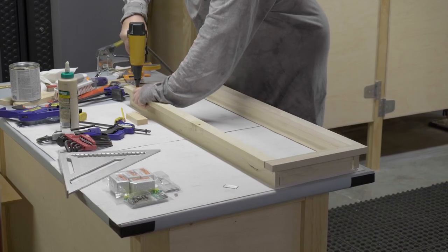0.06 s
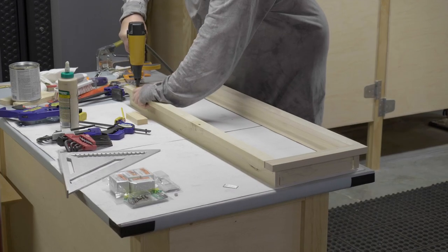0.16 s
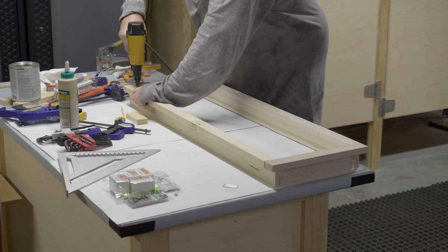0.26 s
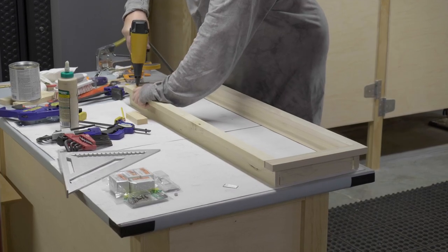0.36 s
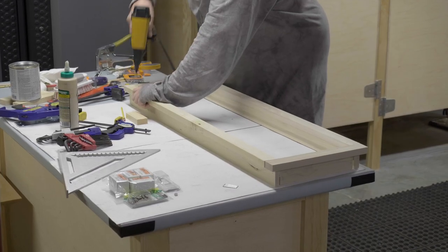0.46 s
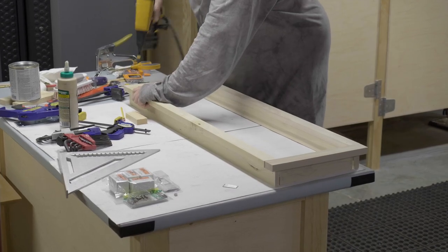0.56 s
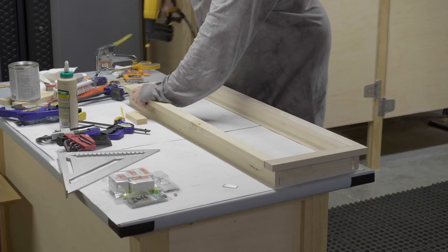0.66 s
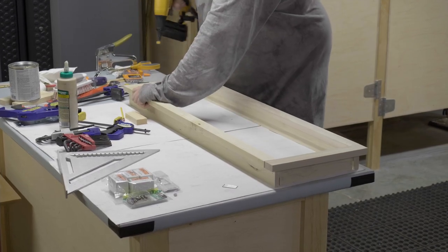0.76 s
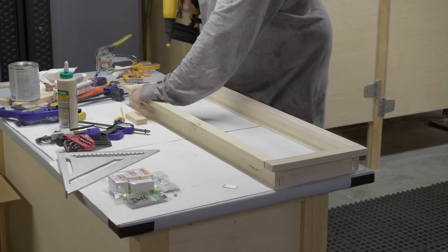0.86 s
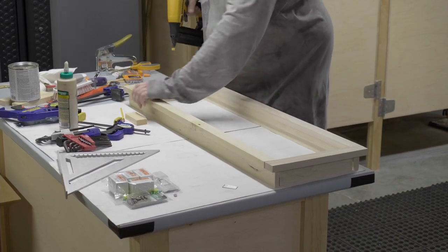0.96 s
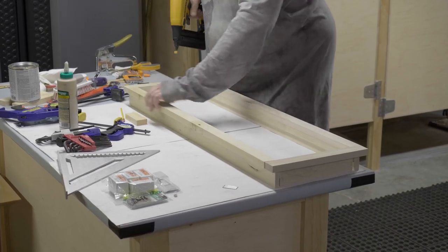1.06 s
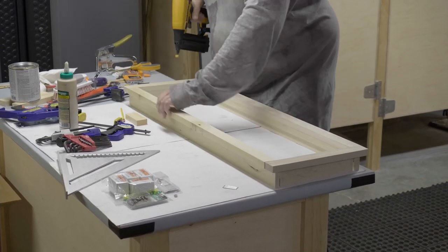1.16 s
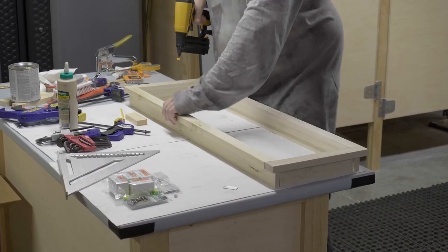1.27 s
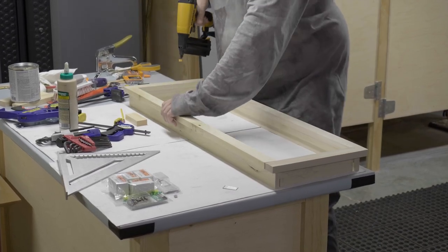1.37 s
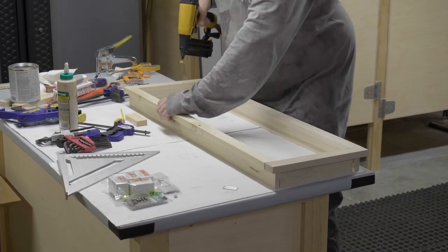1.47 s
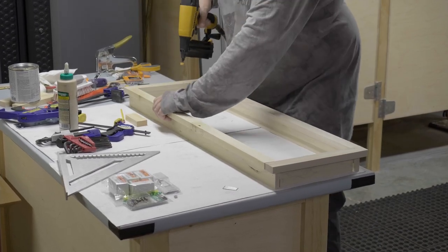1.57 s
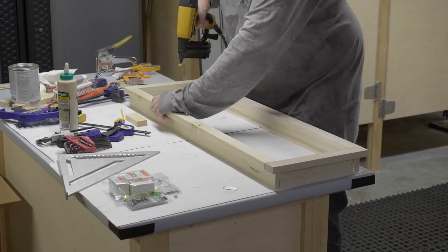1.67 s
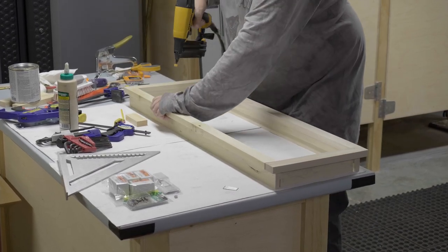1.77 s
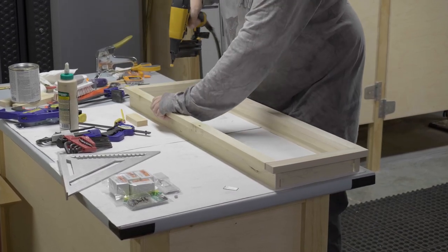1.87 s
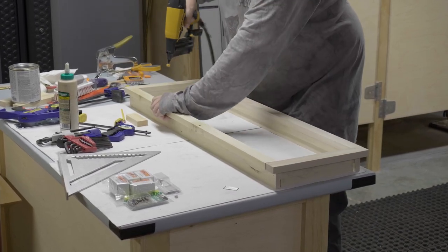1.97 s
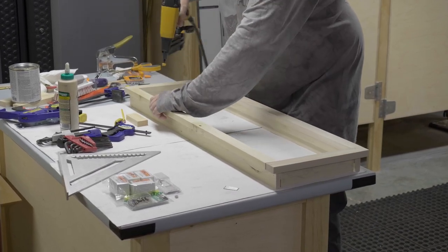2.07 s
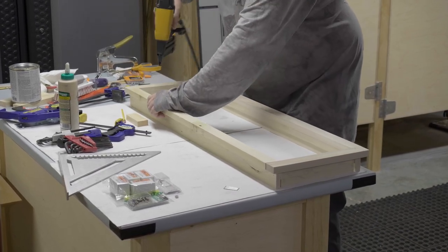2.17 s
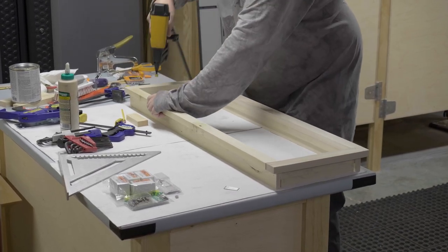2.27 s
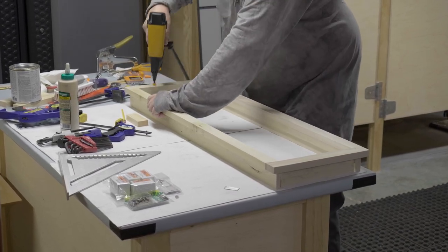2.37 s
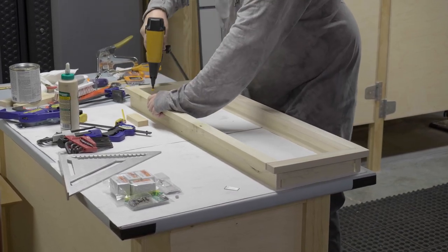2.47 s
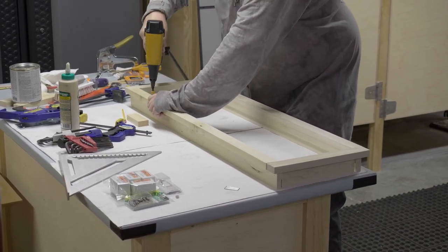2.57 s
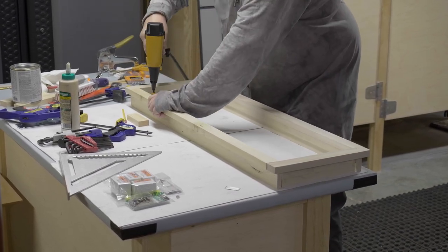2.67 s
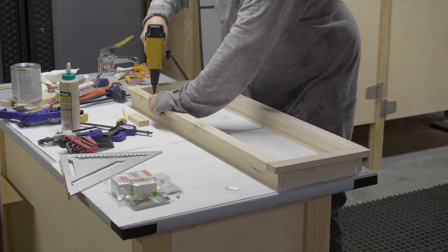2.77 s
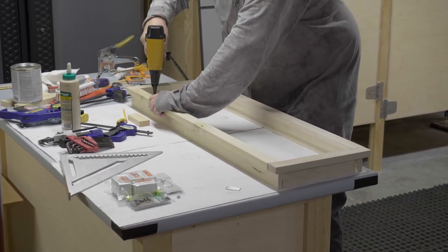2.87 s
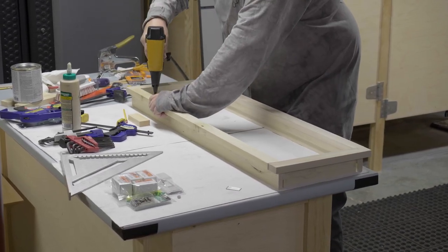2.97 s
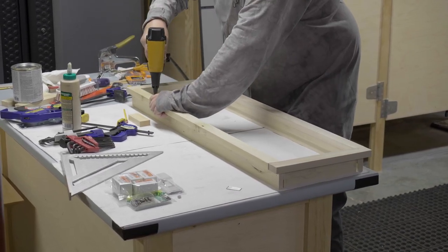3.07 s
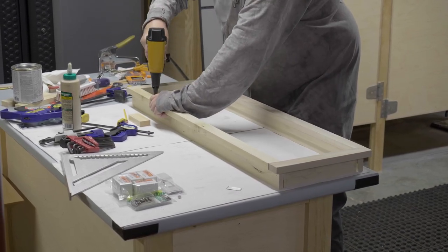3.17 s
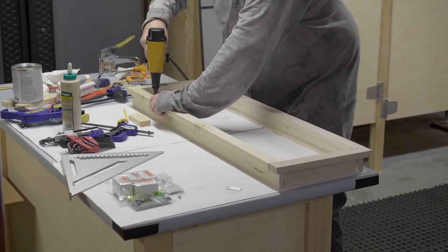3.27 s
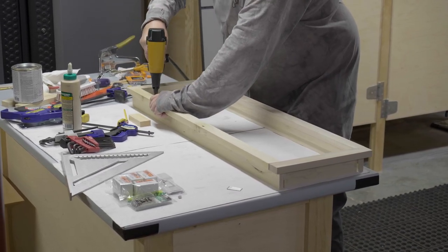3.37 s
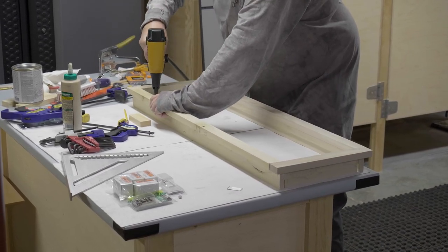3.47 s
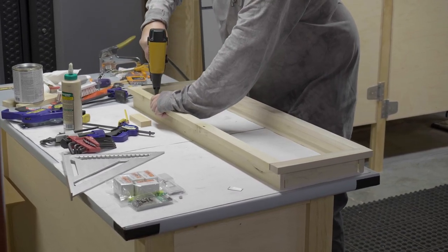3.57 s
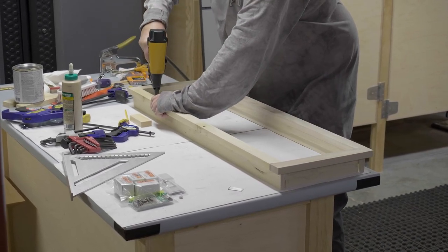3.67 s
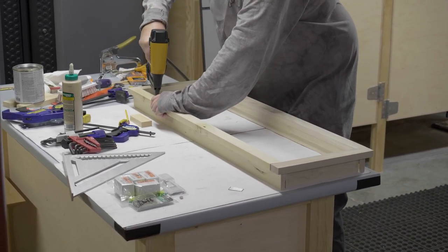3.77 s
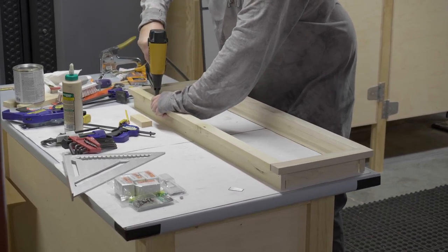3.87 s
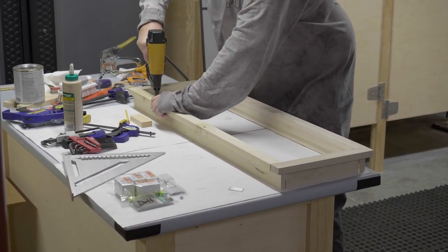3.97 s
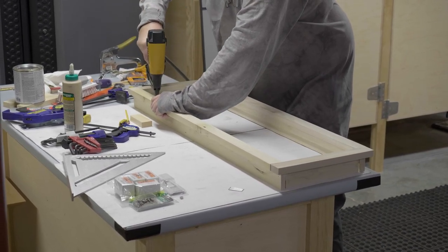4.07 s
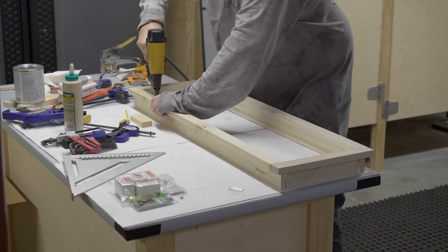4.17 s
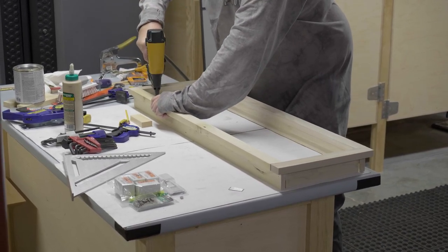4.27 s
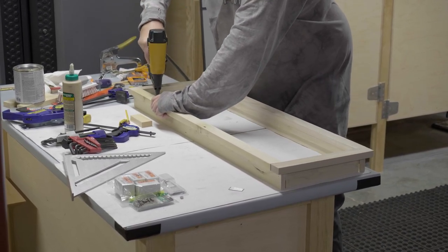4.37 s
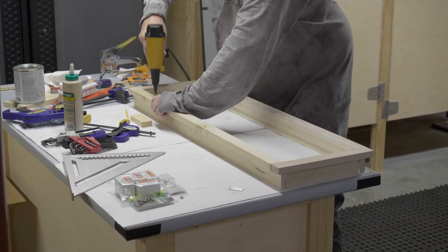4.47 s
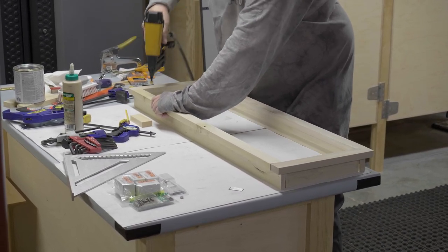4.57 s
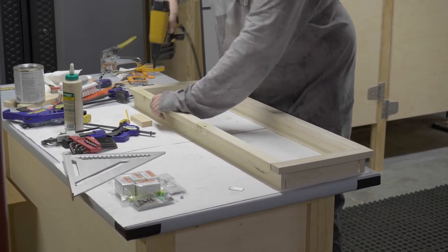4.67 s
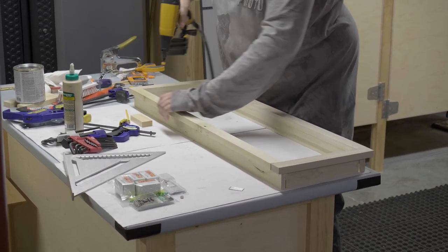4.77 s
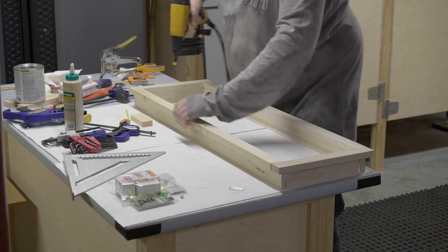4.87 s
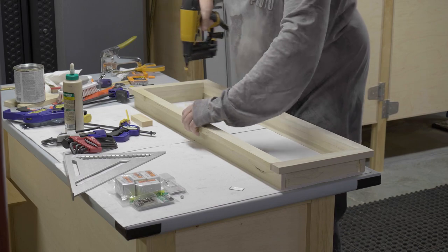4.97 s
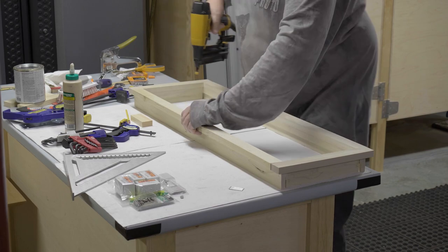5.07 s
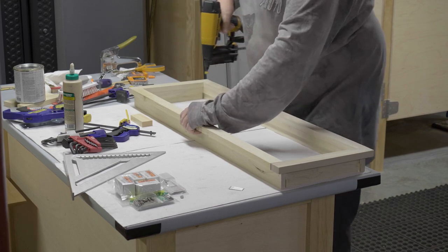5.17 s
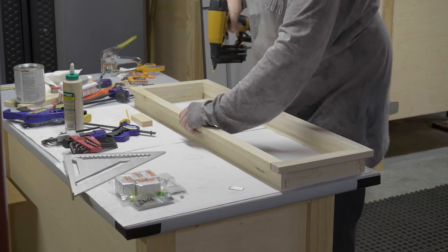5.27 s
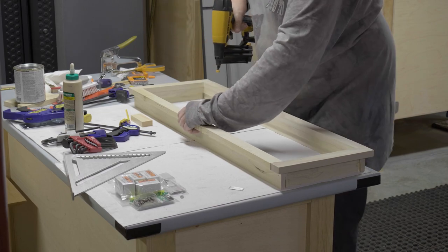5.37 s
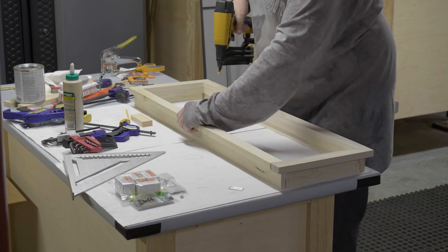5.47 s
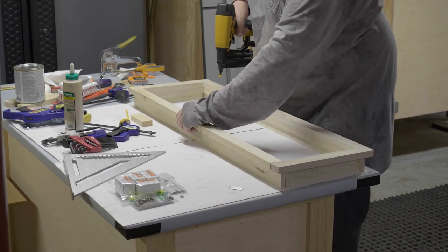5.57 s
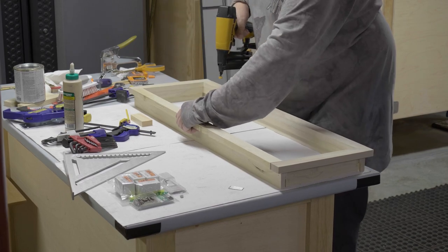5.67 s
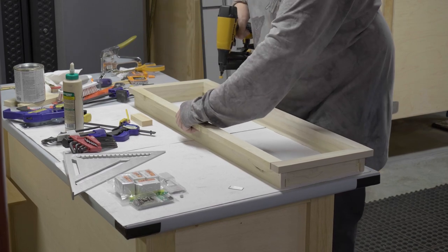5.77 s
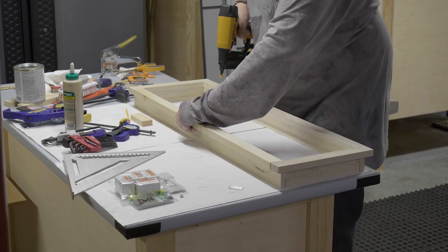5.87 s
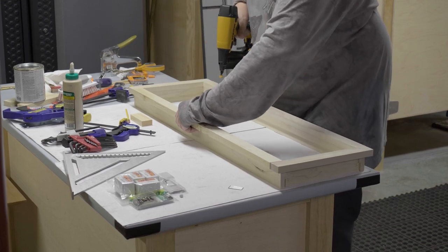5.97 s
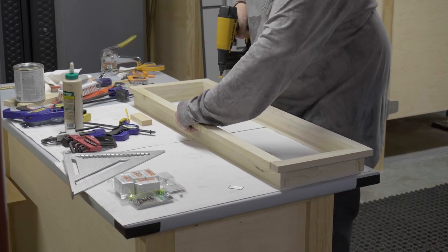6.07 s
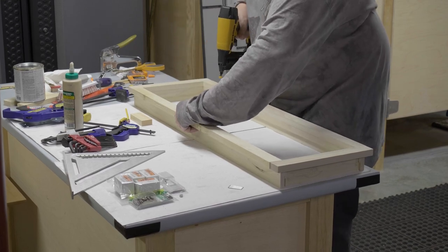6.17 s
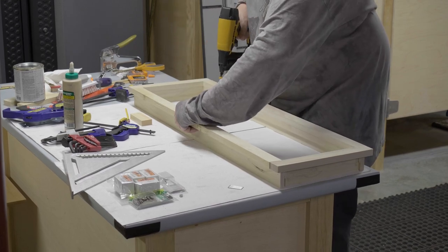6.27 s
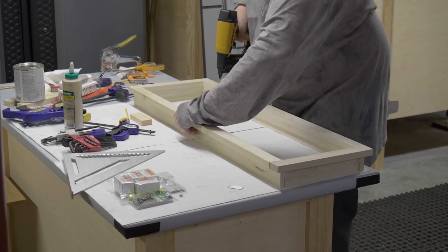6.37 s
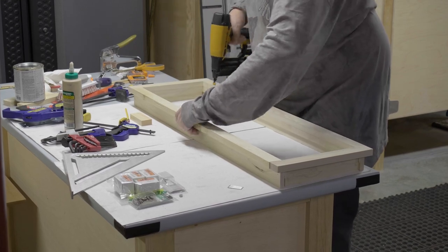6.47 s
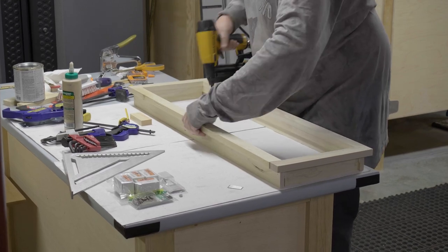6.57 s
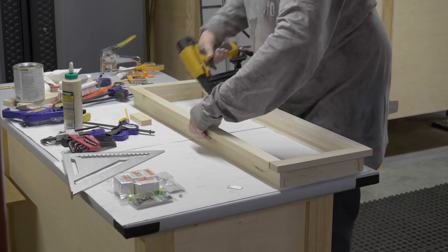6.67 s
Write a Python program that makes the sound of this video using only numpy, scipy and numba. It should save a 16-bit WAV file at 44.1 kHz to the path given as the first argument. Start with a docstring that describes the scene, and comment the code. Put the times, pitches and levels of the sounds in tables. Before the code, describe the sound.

A pneumatic nailer bangs twice into a wooden frame, about four seconds apart, amid faint scraping, nose taps, cloth rustle and quiet room air.

```python
"""An air nailer fires twice into a wooden frame on a workbench: each shot is a pair of steel blows as the
driver strikes and the piston hits its stop, then a clack and a rush of air as the piston snaps back and vents.
Around the shots the frame is shifted, the nose is set down and sleeves rustle, over room air and a far fan.
Blows are filtered noise bursts and decaying modes; rubbing is noise that follows the arm's speed.
Decaying noise tails add the workshop's reverberation; a fast gain control lets the attacks overload."""
import sys
import numpy as np
from scipy import signal
from scipy.fft import rfft, irfft, next_fast_len
from scipy.io import wavfile
from scipy.ndimage import map_coordinates
from numba import njit

SR = 44100
rng = np.random.default_rng(int(sys.argv[2]) if len(sys.argv) > 2 else 0)


def wav_out(sig):
    """Save sig, one row per channel (or a flat mono array), as 16-bit PCM at SR to the path in sys.argv[1]."""
    wavfile.write(sys.argv[1], SR, np.round(np.clip(np.atleast_2d(sig).T, -1, 1) * 32767).astype(np.int16))


N = 295734
# All table levels are relative: each function trims its own layers.


def amp(db):
    """Decibels to gain."""
    return 10 ** (np.asarray(db) / 20)


def unit(x):
    """Scale to rms 1."""
    return x / np.sqrt(np.mean(x ** 2) + 1e-20)


def along(points, hz):
    """Interpolate (f/Hz, value) points on a log frequency axis."""
    f, v = np.transpose(points)
    return np.interp(np.log(hz + 1), np.log(f + 1), v)


def wobble(rate):
    """A smooth random curve with rate knots a second."""
    knots = rng.standard_normal(int(N * rate / SR) + 4)
    return map_coordinates(knots, [np.arange(N) * rate / SR])


def noise(spectrum, size):
    """White noise shaped by a spectrum table and scaled to rms 1."""
    m = next_fast_len(size + 8192)
    gain = amp(along(spectrum, np.fft.rfftfreq(m, 1 / SR)))
    shaped = irfft(rfft(rng.standard_normal(m)) * gain, m)
    return unit(shaped[:size])


def fade(t60):
    """Half a second of exponential decay, down 60 dB after t60 seconds."""
    return amp(-60 * np.arange(SR // 2) / SR / t60)


def burst(spectrum, rise, t60):
    """A puff of coloured noise with a soft onset (rise and t60 in seconds)."""
    t = np.arange(SR // 2) / SR
    onset = 1 - np.exp(-t / rise)
    return noise(spectrum, size=len(t)) * fade(t60) * onset


def ring(modes, scatter_db):
    """Struck modes as decaying sines, each at a new random strength and sign."""
    t = np.arange(SR // 2) / SR
    total = np.zeros(len(t))
    for hz, db, t60 in modes:
        strength = amp(db + scatter_db * rng.standard_normal()) * rng.choice([-1, 1])
        total += strength * fade(t60) * np.sin(2 * np.pi * hz * t)
    return total / np.sqrt(len(modes))


def stroke(start, length, rise, stop):
    """The speed or force of one movement: it builds up, holds and dies away (all in seconds)."""
    t = np.maximum(np.arange(N) / SR - start, 0)
    return (1 - np.exp(-(t / rise) ** 2)) * np.exp(-np.maximum(t - length, 0) / stop)


def add(track, s, sound):
    """Mix a sound in at time s."""
    part = track[max(round(s * SR), 0):][:len(sound)]
    part += sound[:len(part)]


# trigger squeezed, valve opens: t/s, level/dB
VALVE = [(0.2641, -25.5), (4.272, -45), (4.294, -24.5)]
# driver and piston-stop blows: t/s, level/dB, steel crack level/dB
BLOWS = [(0.2705, -2, 0.5), (0.2812, 2, 7), (4.2985, -5, 3), (4.31, 0, 4.5)]
# piston snaps back and vents: t/s, clack level/dB, exhaust level/dB
RETURNS = [(.4218, 14.5, -0.5), (4.444, 15.5, -0.5)]
# colour of the valve puff: f/Hz, level/dB
PUFF = [(100, -13.5), (600, 2), (1200, 1), (2200, -10), (4000, -13.5), (15000, -26.5)]


def nailer():
    """The trigger valve puffs open just ahead of the blows; the piston then returns."""
    out = np.zeros(N)
    for s, db in VALVE:
        add(out, s, workshop(lambda: amp(db) * burst(PUFF, rise=0.0021, t60=0.088), wet_db=1.5))
    for s, db, crack_db in BLOWS:
        add(out, s, workshop(lambda: amp(db + 6.5) * blow(crack_db), wet_db=0.5, count=6))
    for s, clack_db, air_db in RETURNS:
        add(out, s, workshop(lambda: piston_return(clack_db, air_db), wet_db=2.5, count=4))
    return out


# colour of the steel crack: f/Hz, level/dB
CRACK = [(100, -16), (500, 4), (1700, 8), (3000, 0.5), (6000, -6), (9000, 1.5), (13000, -3), (16000, -13.5)]
# modes of the frame on the bench, also rung by knocks: f/Hz, level/dB, t60/s
WOOD = [(155, -20.5, 0.13), (232, -9.5, .16), (264.8, -6.5, 0.21), (342, 2, 0.077), (433, 0.5, 0.059),
        (475, -1, 0.049), (537, -1, 0.092), (605, -7.5, 0.048), (756, -8.5, 0.04), (836, -9, 0.045),
        (1030.4, -2.5, 0.13), (1143, -2, 0.066)]


def blow(crack_db):
    """Steel cracks, the recoil pushes the air and the frame rings."""
    crack = amp(crack_db) * burst(CRACK, rise=0.0014, t60=0.024)
    thump = amp(-0.5) * ring([(550, 0.02, 0.014)], scatter_db=0.5)
    frame = amp(-2) * ring(WOOD, scatter_db=2.5)
    return crack + thump + frame


# colour of the piston clack: f/Hz, level/dB
SNAP = [(100, -9.5), (450, 4), (800, -5), (1250, 2), (2000, 5), (3200, -9), (6000, -14.5), (9000, -9.5),
        (15000, -27)]
# modes of the tool's housing: f/Hz, level/dB, t60/s
HOUSING = [(360, -1, 0.038), (514, -4, .025), (1250, -2.5, 0.037), (1540, -10.5, 0.048), (1950, -5, 0.055),
           (2131, -4, 0.032), (2260, -3.5, .045), (2436, -4.5, 0.05), (2770, -3, 0.013), (3230, -5, .025)]
# colour of the spent air: f/Hz, level/dB
EXHAUST = [(80, -15.5), (150, -8.5), (500, -4.5), (900, 4.5), (2100, 0), (3200, -2), (4500, -5.5),
           (6500, -4), (9500, -4.5), (13000, -8), (16000, -16.5)]


def piston_return(clack_db, air_db):
    """The piston clacks home against the housing, jolting the whole tool, and the spent air rushes out."""
    clack = burst(SNAP, rise=0.0022, t60=0.025) + amp(-10) * ring(HOUSING, scatter_db=1)
    jolt = amp(-17.5) * ring([(429, 0.0027, 0.022)], scatter_db=2.5)
    exhaust = amp(air_db) * burst(EXHAUST, rise=0.01, t60=0.25)
    return amp(clack_db) * (clack + jolt) + exhaust


# frame bumps and rocks on the bench: t/s, wood thud level/dB, dry clack level/dB
KNOCKS = [(1.377, -36, -39), (1.454, -29, -34.5), (1.466, -28.5, -21.5), (3.497, -41, -51.5),
          (5.483, -35, -25), (5.511, -38, -25), (5.545, -42, -27), (6.458, -39.5, -53)]
# nose meets the frame: t/s, wood thud level/dB, dry clack level/dB, tip spring level/dB, metal tick level/dB
NOSE_TOUCHES = [(0.129, -35, -18.5, -29, -19), (2.44, -12.5, -31.5, -40, -41),
                (2.457, -23.5, -45, -45, -52), (2.928, -27, -36, -28, -37.5),
                (3.044, -31.5, -35.5, -46, -47.5), (3.076, -31.5, -44, -34.5, -42),
                (3.17, -26, -26, -22.5, -44.5)]
# small steel parts of the nose and trigger: t/s, level/dB
TINKS = [(2.947, -32.5), (3.058, -33), (4.597, -10.5)]
# colour of those steel parts: f/Hz, level/dB
STEEL = [(4000, -26.5), (9000, -21.5), (12200, -8.5), (12900, 3.5), (13600, -19), (16000, -17)]
TIP_HOME_S = 3.17  # the safety tip is pushed all the way in


def handling():
    """The frame is shifted, the nose is set down and pressed, loose steel parts tink."""
    out = np.zeros(N)
    for s, *levels in KNOCKS:
        add(out, s, workshop(lambda: knock(*levels), wet_db=0.5, count=3))
    for s, *levels in NOSE_TOUCHES:
        add(out, s, workshop(lambda: nose_touch(*levels), wet_db=-0.5, count=3))
    add(out, TIP_HOME_S, workshop(tip_home, wet_db=0.5, count=3))
    for s, db in TINKS:
        add(out, s, workshop(lambda: amp(db - 6) * burst(STEEL, rise=0.001, t60=0.028), wet_db=-4.5))
    return out


# colour of the wood thud: f/Hz, level/dB
THUD = [(90, -18), (180, -30), (250, 3.5), (350, 3.5), (450, -1), (560, 0), (700, -10.5), (860, -2.5),
        (1080, -3.5), (1350, -21), (3000, -23), (8000, -43.5)]
# colour of the dry surface clack: f/Hz, level/dB
CLACK = [(100, -16), (400, -4), (850, 7.5), (1300, 4.5), (2300, 0.5), (3500, -14.5), (7000, -31),
         (15000, -25.5)]
KNOCK_RISE_S = 0.003


def knock(thud_db, clack_db):
    """A light blow on the frame: a dull thud of the wood and a dry clack of its surface."""
    wood = burst(THUD, rise=KNOCK_RISE_S, t60=0.07) + amp(-7.5) * ring(WOOD, scatter_db=3.5)
    clack = amp(clack_db - 2.5) * burst(CLACK, rise=KNOCK_RISE_S, t60=0.027)
    return amp(thud_db - 8) * wood + clack


# colour of the tip's spring: f/Hz, level/dB
SPRING = [(300, -15), (1600, -10.5), (2150, 5.5), (2600, 0), (3100, -15), (3750, -7), (4800, -23.5),
          (6000, -18), (8000, -28), (15000, -33.5)]
# colour of the loaded bench: f/Hz, level/dB
BENCH = [(60, -13), (110, 2), (170, -9), (280, -28), (800, -49)]
# colour of the metal tick: f/Hz, level/dB
TICK = [(500, -15.5), (2000, -4.5), (4000, -0.5), (7000, 2.5), (11000, 2.5), (16000, -11)]


def nose_touch(thud_db, clack_db, spring_db, tick_db):
    """The steel nose ticks on the frame and knocks it; the tip's spring gives and the bench takes the weight."""
    spring = amp(-5) * burst(SPRING, rise=0.0024, t60=0.05)
    bump = amp(-11) * burst(BENCH, rise=0.0088, t60=0.12)
    tick = amp(tick_db - 7) * burst(TICK, rise=0.001, t60=0.049)
    return knock(thud_db, clack_db) + amp(spring_db - 6) * (spring + bump) + tick


# modes of the safety tip: f/Hz, level/dB, t60/s
TIP = [(1034, -0.5, 0.1), (1084, 1, .08), (2200, -12, .035), (2420, -12, .035)]


def tip_home():
    """The safety tip slides in against its spring, so its ring swells in."""
    swell = 1 - fade(0.03)
    return amp(-25.5) * swell * ring(TIP, scatter_db=2.5)


# hard pushes that make the frame groan: start t/s, length t/s, starting level/dB
PUSHES = [(0.735, 0.49, -50), (4.737, .42, -46.5), (5.294, .16, -56.5)]
# wood squeaks on the bench top: start t/s, length t/s, pitch f/Hz, level/dB
SQUEAKS = [(.88, .15, 2183, -63), (4.998, .06, 3290, -62)]
# colour of the groan: f/Hz, level/dB
JUDDER = [(60, -59), (150, -33), (215, -32), (245, 1), (300, -1.5), (345, -8), (450, -32), (1000, -44.5)]
PUSH_RISE_S, PUSH_STOP_S, PUSH_EASE_DB_PER_S = 0.04, 0.046, 17.5


def stick_slip():
    """Pushed hard, the frame judders in its lowest modes, less as the push eases; now and then it squeaks."""
    t = np.arange(N) / SR
    force = np.zeros(N)
    for s, length, db in PUSHES:
        easing = amp(db - PUSH_EASE_DB_PER_S * np.maximum(t - s, 0))
        force += easing * stroke(s, length, PUSH_RISE_S, PUSH_STOP_S)
    out = force * amp(wobble(12)) * noise(JUDDER, size=N)
    for s, length, hz, db in SQUEAKS:
        add(out, 0, workshop(lambda: amp(db) * squeak(s, length, hz), wet_db=4, count=1))
    return out


def squeak(s, length, hz):
    """A short stick-slip tone: a sine whose pitch wavers quickly at random."""
    waver = 0.022 * wobble(150)  # as a share of the pitch
    phase = 2 * np.pi * np.cumsum(hz * (1 + waver)) / SR
    return stroke(s, length, rise=0.031, stop=0.03) * np.sin(phase)


# arm movements that shift the frame: start t/s, length t/s, sleeve rustle level/dB, frame scrape level/dB
MOVES = [(0.01, 0.23, -58, -54.5), (0.716, 0.34, -58, -50.5), (1.212, 0.55, -54.5, -59),
         (1.804, 0.4, -69, -59.5), (2.102, 0.22, -56.5, -57), (2.63, 0.34, -64.5, -63),
         (3.393, 0.33, -69, -64.5), (3.697, 0.26, -60, -65.5), (4.745, 0.44, -59, -56),
         (5.177, .29, -57, -51.5), (5.47, 0.096, -51.5, -45.5), (5.662, 0.18, -68, -60.5),
         (6.47, 0.36, -60.5, -60.5)]
# colour of the frame dragging on the bench: f/Hz, level/dB
SCRAPE = [(70, -28), (130, -9), (220, -6), (295, 4), (400, 2), (700, -5), (1200, -4.5), (2300, -13.5),
          (4000, -26.5), (10000, -45.5)]
# colour of the sleeves: f/Hz, level/dB
CLOTH = [(50, -43.5), (300, -15.5), (1500, 7.5), (3000, 1.5), (6000, -6.5), (11000, -2), (14000, -10.5),
         (16000, -13)]
MOVE_RISE_S, MOVE_STOP_S = 0.041, 0.11  # an arm gathers speed and comes to rest
FIDGET_DB = -71.5  # steady floor of sleeve rustle


def rubbing():
    """Each arm movement brushes the sleeves along and drags the frame unevenly over the bench."""
    speed = np.array([stroke(s, length, MOVE_RISE_S, MOVE_STOP_S) for s, length, _, _ in MOVES])
    _, _, sleeve_db, scrape_db = np.transpose(MOVES)
    # overlapping movements add in power
    sleeve = np.sqrt(amp(sleeve_db) ** 2 @ speed ** 2 + amp(FIDGET_DB) ** 2)
    scrape = np.sqrt(amp(scrape_db) ** 2 @ speed ** 2)
    grip_db = 1.3 * wobble(35)
    folds_db = 1.1 * wobble(49)
    dragging = scrape * amp(grip_db) * noise(SCRAPE, size=N)
    rustling = sleeve * amp(folds_db) * noise(CLOTH, size=N)
    return dragging + rustling


# colour of the room air: f/Hz, level/dB
AIR = [(25, -54), (55, -33), (80, -15), (110, 0), (250, -5.5), (350, -9), (520, 4), (700, -9), (1250, -0.5),
       (2000, -12), (4000, -15.5), (9000, -16), (13000, -20.5), (16000, -22.5)]
# lines of a far fan: f/Hz, level/dB
FAN = [(123.8, -83), (958.2, -75), (1287, -76.5), (1437, -72.5), (1916, -78)]


def background():
    """Room air as steady noise, with the faint lines of a fan as sines of wandering phase."""
    t = np.arange(N) / SR
    lines = np.zeros(N)
    for hz, db in FAN:
        lines += amp(db + 4) * np.sin(2 * np.pi * hz * t + 0.87 * wobble(2.4))
    return amp(-58) * noise(AIR, size=N) + lines


def workshop(source, wet_db, count=2):
    """A source sends one waveform to the microphone and a different one towards each of count walls."""
    reflected = sum(signal.fftconvolve(source(), room_tail()) for _ in range(count))
    out = amp(wet_db) * reflected / np.sqrt(count)
    add(out, 0, source())
    # small objects radiate hardly any deep bass
    return signal.sosfilt(signal.butter(5, 115, "high", fs=SR, output="sos"), out)


# decay of the workshop: f/Hz, t60/s
ROOM = [(100, 0.74), (300, 0.46), (1000, 0.47), (2500, 0.43), (5000, 0.39), (9000, 0.25), (15000, 0.17)]


def room_tail(build=0.0015):
    """A diffuse noise tail of energy 1 that builds up (in seconds) and loses its treble first."""
    hz, t, z = signal.stft(rng.standard_normal(2 * SR // 3), SR, nperseg=256)
    decay = amp(-60 * t / along(ROOM, hz)[:, None])
    tail = signal.istft(z * decay, SR, nperseg=256)[1]
    tail *= 1 - np.exp(-np.arange(len(tail)) / SR / build)
    return tail / np.linalg.norm(tail)


def scene():
    """Everything at one microphone."""
    return (nailer() + handling() + stick_slip() + rubbing() + background())[None]


@njit
def follow(size, attack, release):
    """An envelope that rises and falls at different speeds (in samples)."""
    out, level = np.zeros(len(size)), 0.
    for i in range(len(size)):
        level += (size[i] - level) / (attack if size[i] > level else release)
        out[i] = level
    return out


def gain_control(x, limit_db, attack, release, knee):
    """Turn down whatever exceeds the limit; the first milliseconds slip through (times in seconds)."""
    level = follow(np.abs(x), max(attack * SR, 1), max(release * SR, 1))
    return x / (1 + (level / amp(limit_db)) ** knee) ** (1 / knee)


TOP_HZ = 15750  # nothing passes from here up


def record(dry):
    """Gain control, rounded overload at full scale and the band limit."""
    held = gain_control(dry[0], limit_db=-16, attack=0.0056, release=0.015, knee=2.5)
    clipped = held / (1 + held ** 6) ** (1 / 6)
    m = next_fast_len(N + SR // 2)
    passband = np.fft.rfftfreq(m, 1 / SR) < TOP_HZ
    return irfft(rfft(clipped, m) * passband, m)[None, :N]


dry = scene()
out = record(dry)
wav_out(out)
```